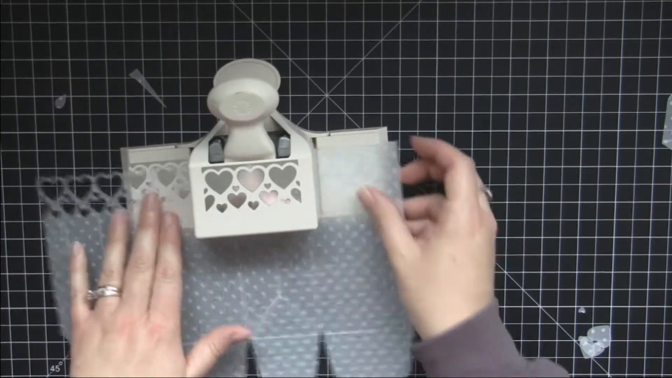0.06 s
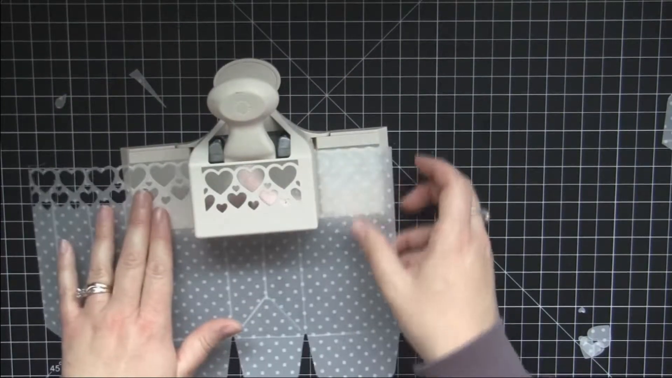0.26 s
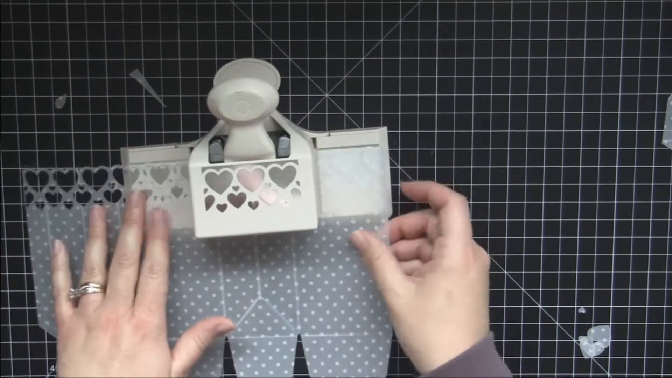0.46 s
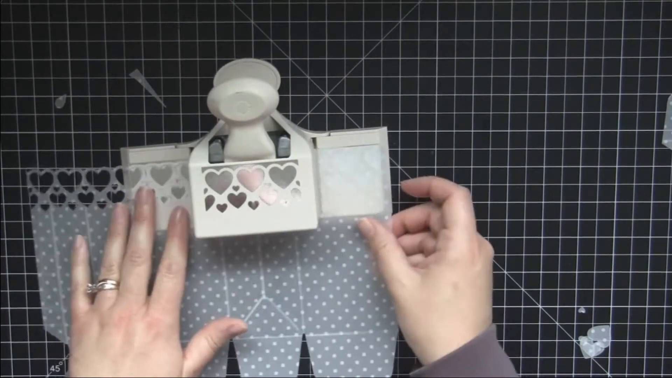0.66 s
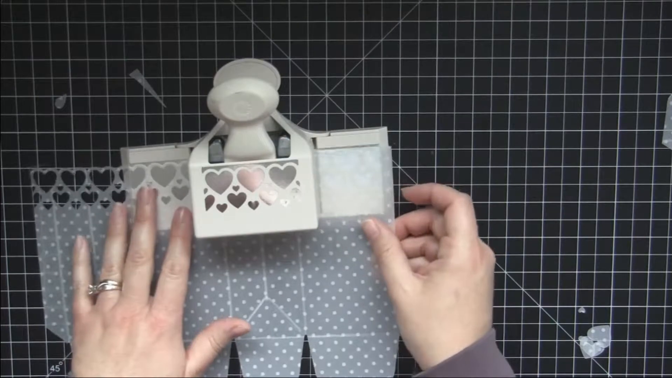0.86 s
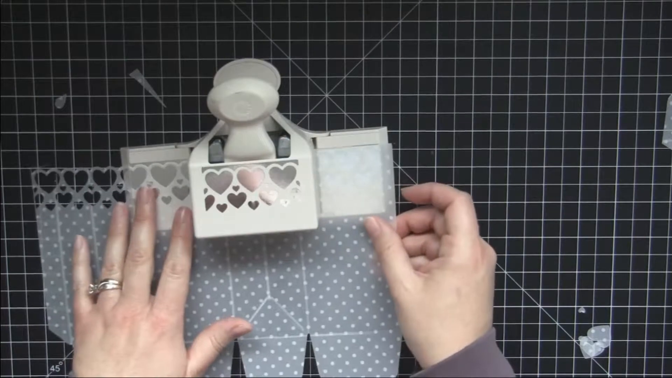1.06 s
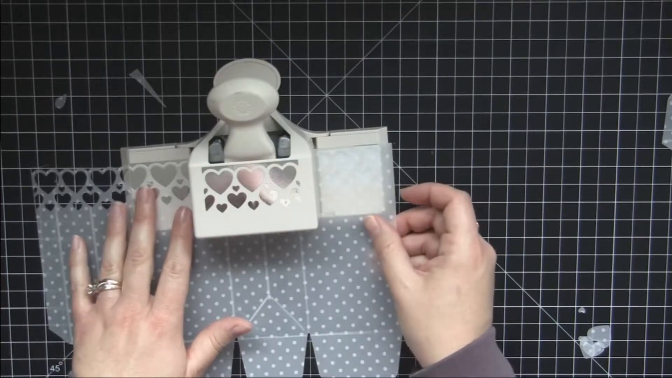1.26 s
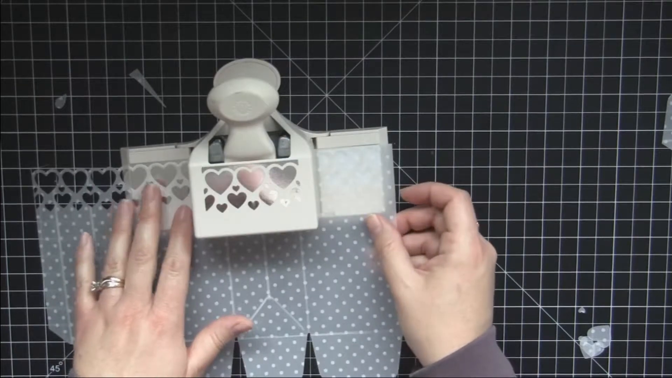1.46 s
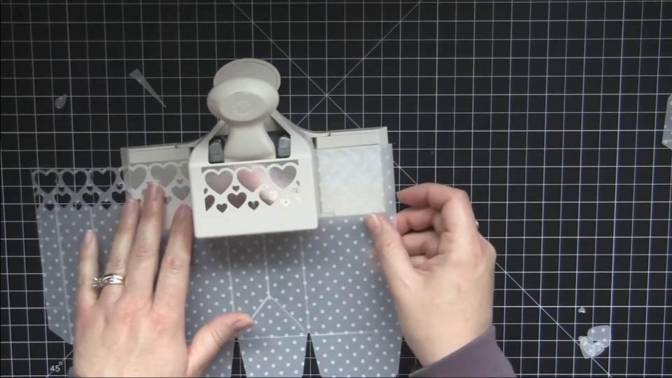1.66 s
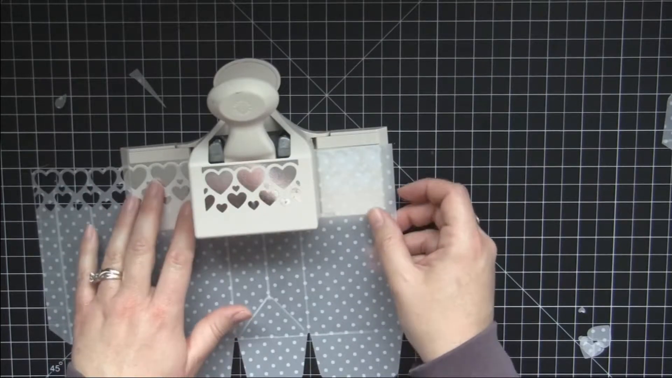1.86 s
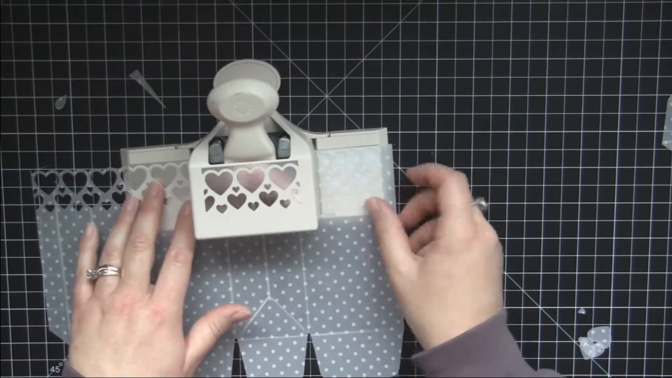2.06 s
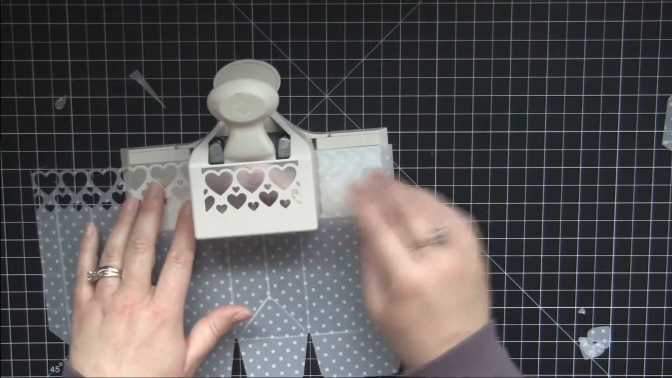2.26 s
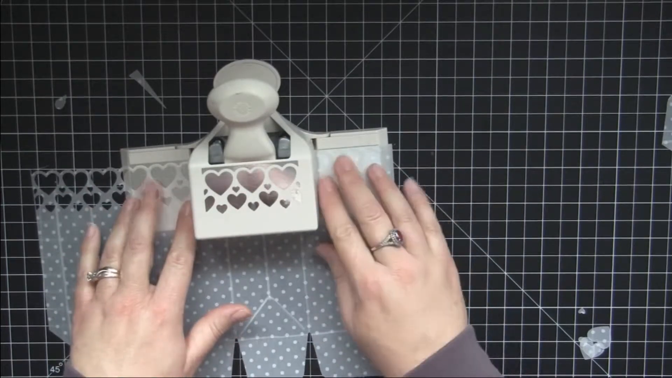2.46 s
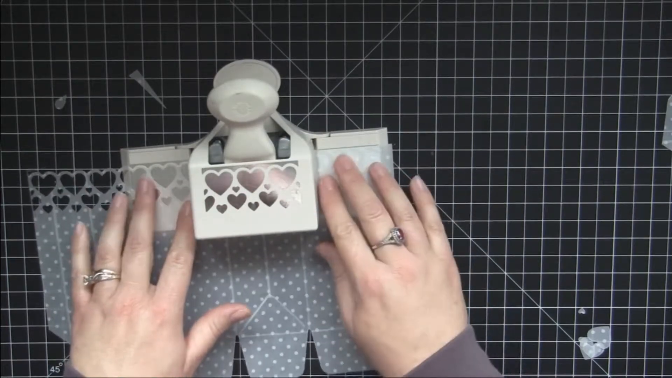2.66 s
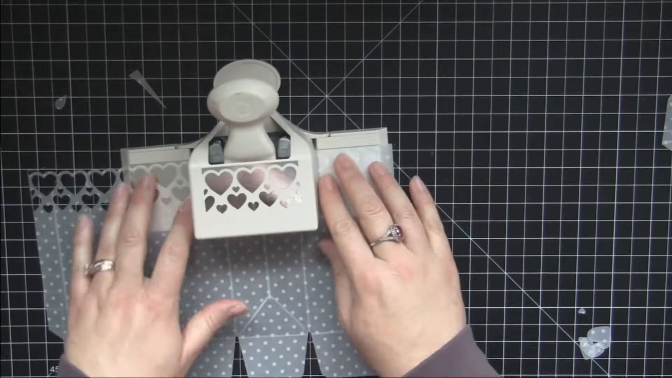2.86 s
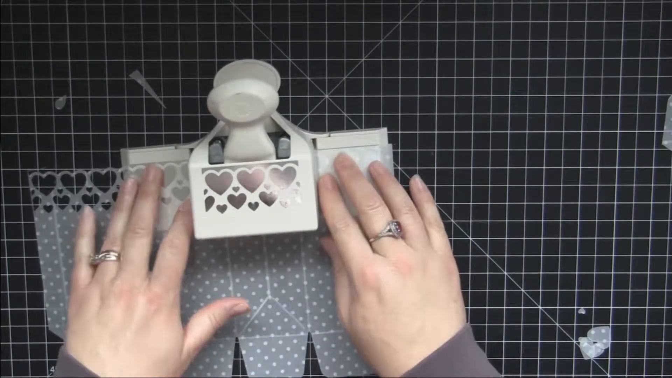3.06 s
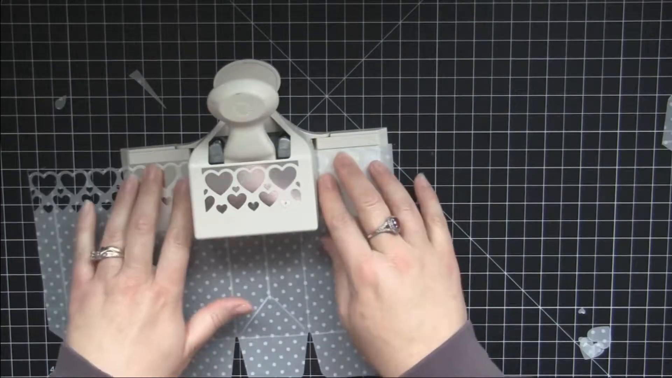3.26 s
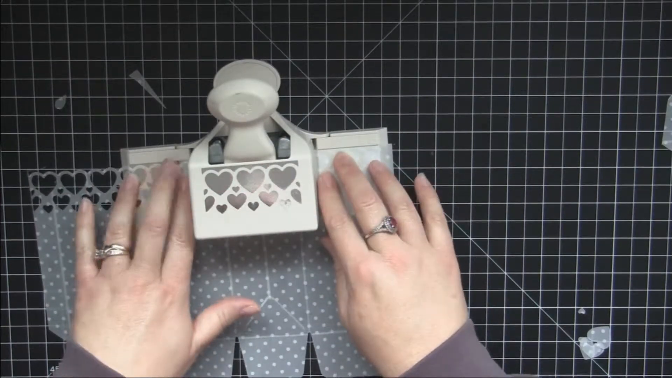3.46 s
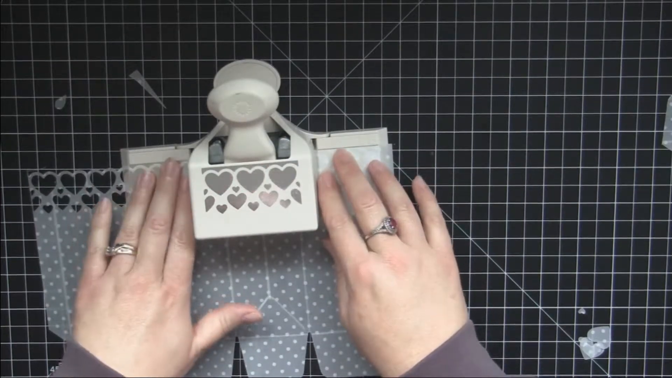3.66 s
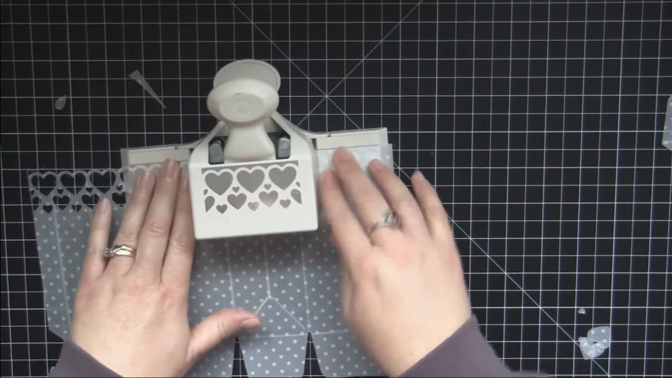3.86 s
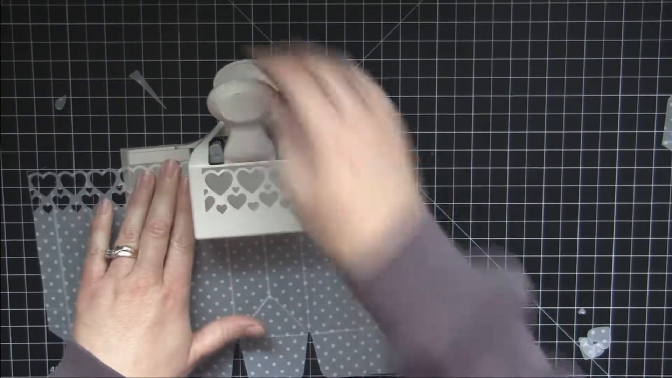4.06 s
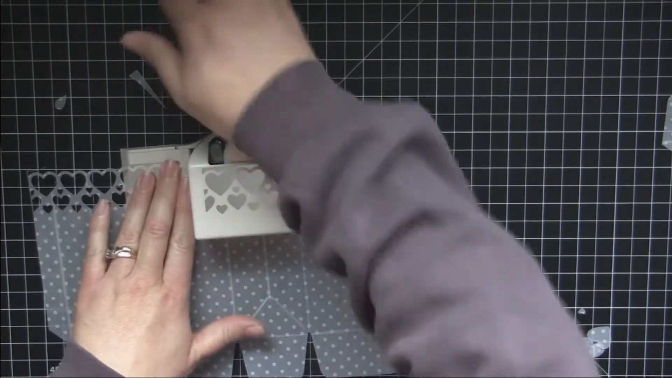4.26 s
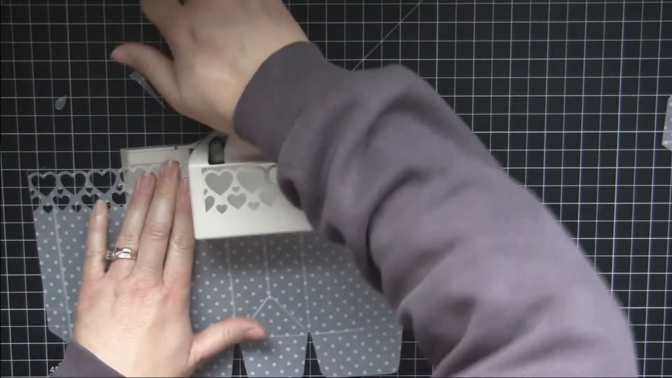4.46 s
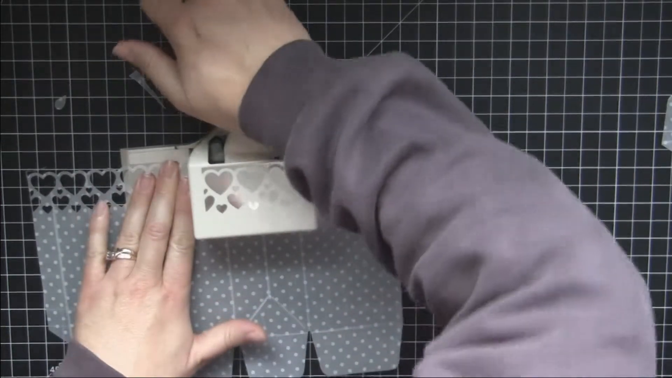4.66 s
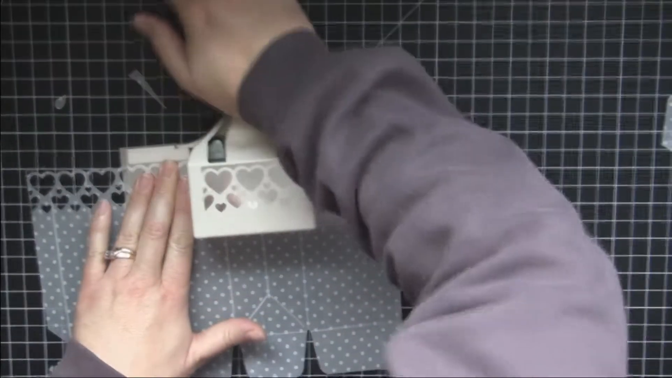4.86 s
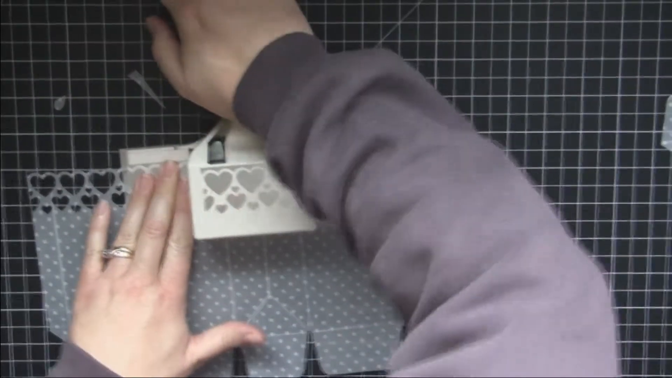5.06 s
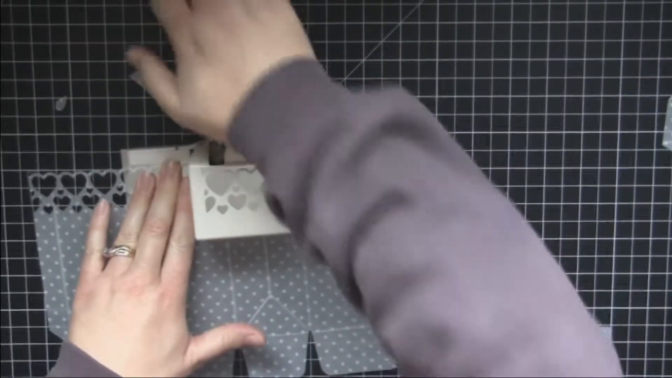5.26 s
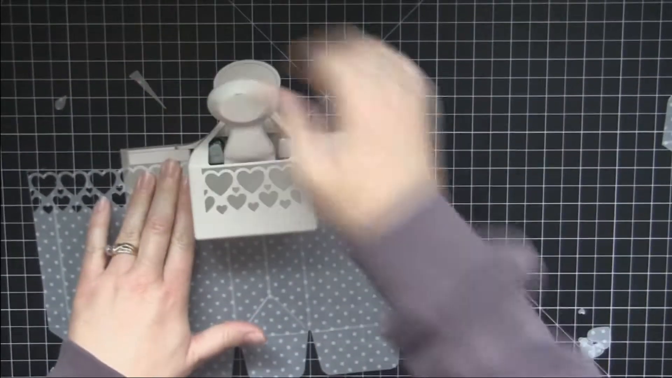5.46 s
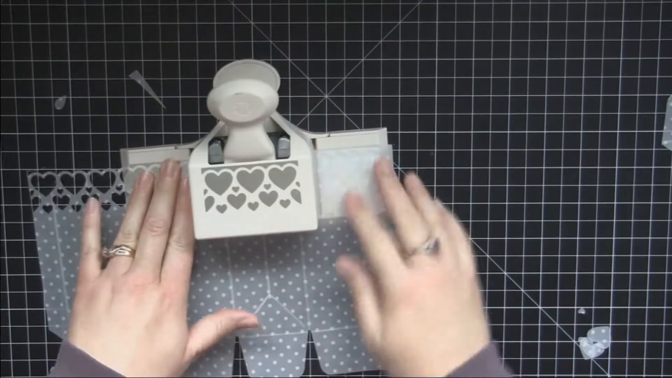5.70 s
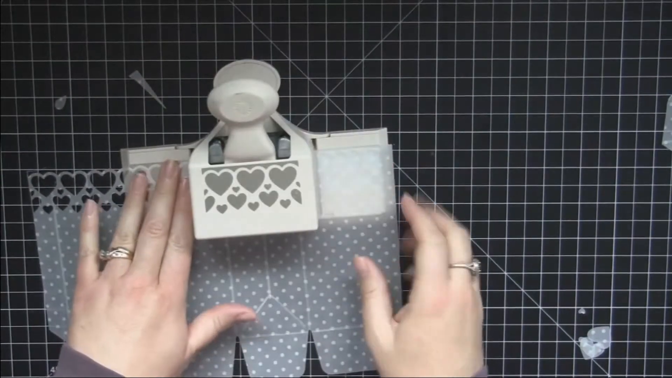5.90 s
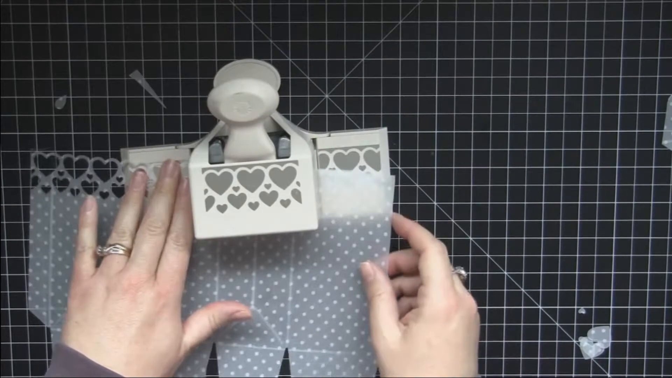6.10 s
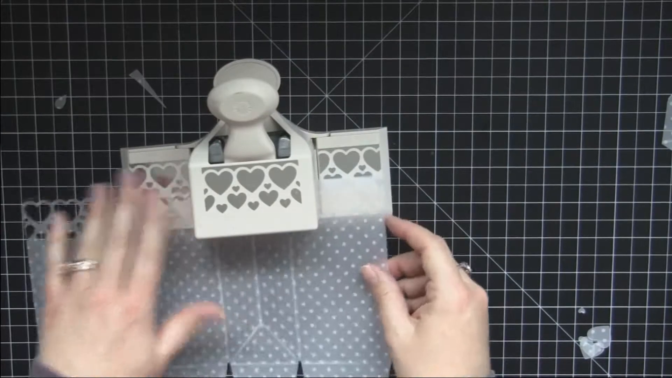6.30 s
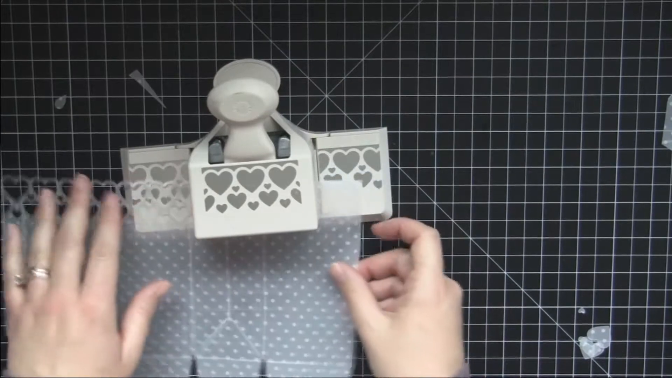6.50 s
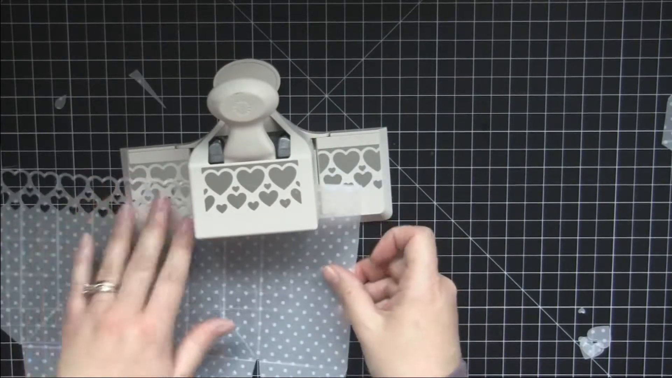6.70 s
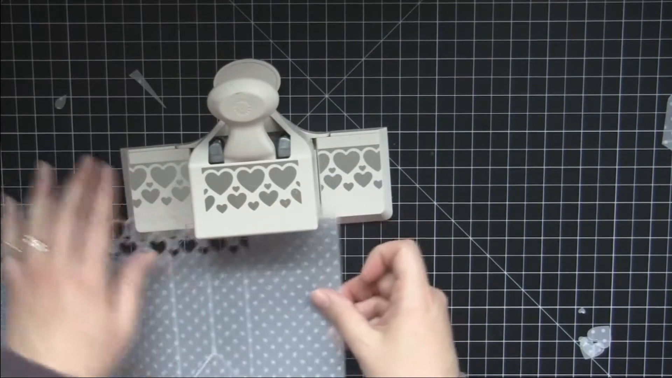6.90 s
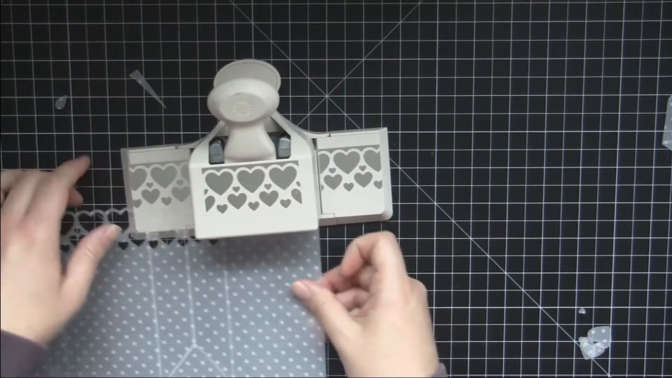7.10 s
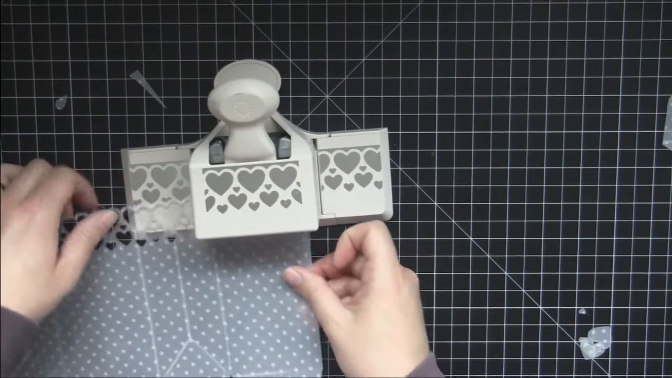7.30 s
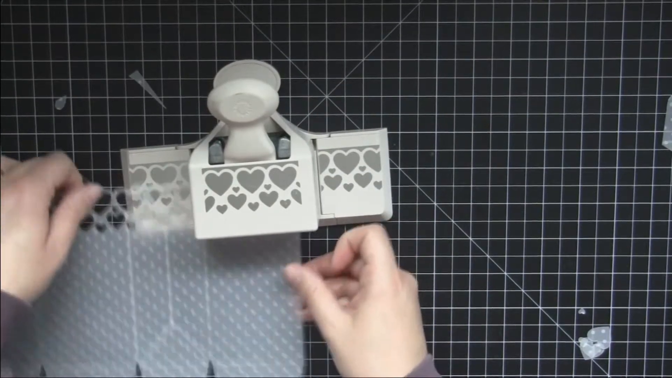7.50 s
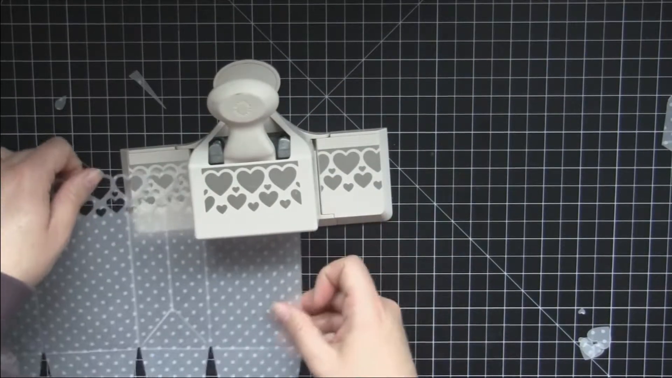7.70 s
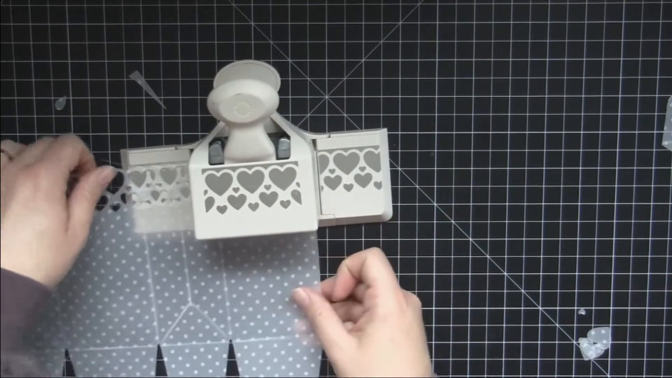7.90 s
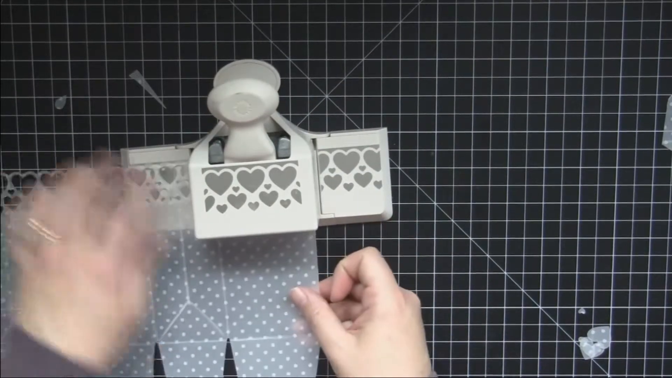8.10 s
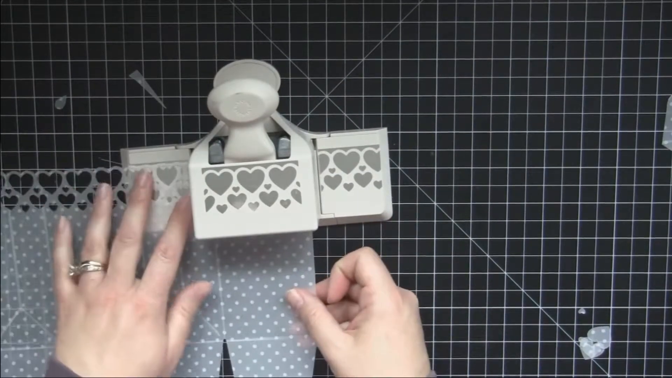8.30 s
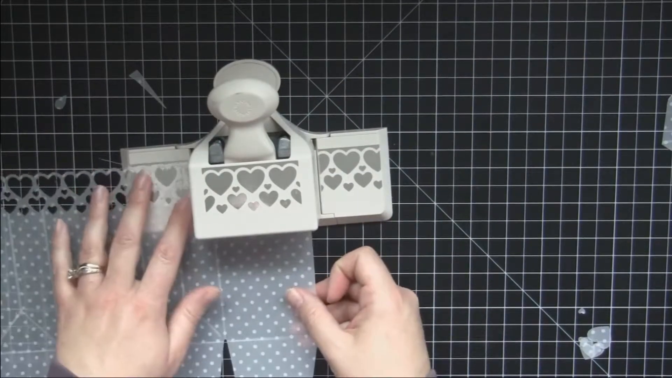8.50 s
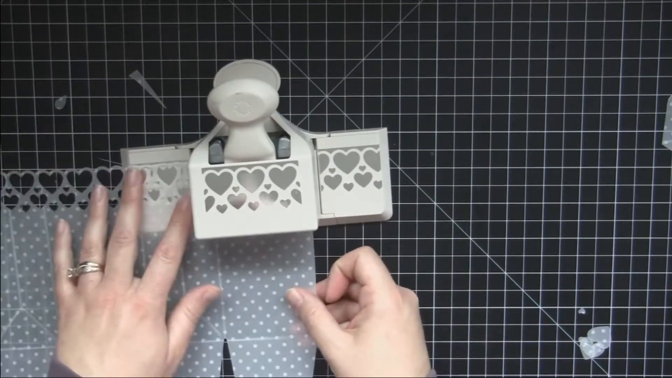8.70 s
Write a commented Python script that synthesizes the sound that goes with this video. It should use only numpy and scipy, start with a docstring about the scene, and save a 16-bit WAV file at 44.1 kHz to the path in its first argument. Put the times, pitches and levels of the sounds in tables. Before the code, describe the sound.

Thin stiff paper rustles, a craft punch crunches through it and clacks back up, then the sheet slides on.

```python
"""A small quiet room, close on a hand craft punch on a cutting mat.
Thin, stiff vellum rubs, hisses and snaps as it is slid and nudged along the hollow base.
The lever is pressed and the blades crunch through the sheet, ringing the loaded frame.
The lever scrapes back up, its return spring ticks, and the plastic housing clacks as it settles.
The sheet slides on, with one hard pull, over a steady hush."""
import sys
import numpy as np
from scipy import signal
from scipy.fft import rfft, irfft, next_fast_len
from scipy.io import wavfile
from scipy.ndimage import uniform_filter1d

SR = 44100
rng = np.random.default_rng(int(sys.argv[2]) if len(sys.argv) > 2 else 0)


def file_out(sig):
    """Save sig as 16-bit WAV at sys.argv[1]."""
    # one column per channel
    cols = np.atleast_2d(sig).T
    # limit, then scale
    lim = np.clip(cols, -1, 1)
    pcm = np.round(lim * 32767).astype(np.int16)
    wavfile.write(sys.argv[1], SR, pcm)


N = 385814

# lever strokes: three cuts, the return, the slack taken up
# (start [s], peak [s], end [s], level [dB], scrape offset [dB], swell from start to peak [dB])
LEVER_STROKES = [(4.637, 4.665, 4.77, -26.5, -28, -2), (4.822, 4.865, 4.93, -12.5, -21.5, 5),
                 (4.93, 4.957, 5.07, -15.5, -19.5, 6.5), (5.207, 5.375, 5.45, -32, -10, 7),
                 (4.802, 4.824, 4.85, -31, -26, 2)]
# bright edge of scrapes and cracks: (frequency [Hz], level [dB])
EDGE_SPECTRUM = [(2500, -18.5), (4200, -11.5), (5500, -17.5), (11000, -19), (15700, -37)]
FADE_DB = 31  # a stroke ends this far under its peak


def blades():
    """The lever grinds and scrapes while the blades bite through the sheet and ring the frame."""
    # blades breaking through: (time [s], level [dB], sharpness [dB])
    breaks = [(4.608, -22, -7), (4.638, -12.5, 11.5), (4.727, -23.5, -14.5), (4.803, -22, -7),
              (4.825, -11, -7), (4.837, -9, 8), (4.937, -7, 6), (4.953, -1, 9), (4.966, -1.5, 11)]
    # modes of the punch under load: (frequency [Hz], base width [Hz], level [dB])
    frame = [(204, 20, -4), (337, 15, 0), (483, 33, 2), (706, 99, 2.5), (894, 98, 0), (1257, 93, 4),
             (1506, 207, -1), (1854, 69, -3.5), (2350, 59, -7.5), (3010, 185, -8), (3610, 127, -9),
             (4336, 170, -13.5)]
    force = friction(slips_per_s=1400, spread_db=6, smooth=.4)
    pushes = [stroke(*row[:4], row[5]) for row in LEVER_STROKES]
    pressure = sum(pushes)
    low, high = (unit(resonant(force, modes, widen=2.5)) for modes in (frame[:5], frame[5:]))
    # light pressure sounds duller than the full cut
    grind = amp(-7.5) * pressure * (low + amp(9) * pressure ** 0.44 * high)
    scrape_gain = sum(push * amp(row[4]) for push, row in zip(pushes, LEVER_STROKES))
    bites = strike(breaks + crunch(), frame, widen=2.3, attack_s=0.00054, chatter_s=0.00406,
                   tilt_db=4.5, sharp_tilt=0.5, crack_t60=0.023, crack_db=-6.5, drift=0.027)
    return grind + scrape_gain * coloured(force, EDGE_SPECTRUM) + amp(-3.5) * bites


def crunch(mean_gap_s=.009):
    """Small random bites crowd each cut: (time [s], level [dB], sharpness [dB])."""
    bites = []
    for start, peak, end, db, _, swell_db in LEVER_STROKES[:3]:
        gap, softness = rng.random((2, 8))
        times = start + np.cumsum(mean_gap_s * (.5 + gap))
        contour = np.interp(times, [start, peak, end], [-swell_db, 0, -FADE_DB], right=-200)
        bites += zip(times, db + contour - 6 * softness, -3 - 5 * softness)
    return bites


def housing():
    """Knocks ring the plastic shell in short clacks."""
    # knocks: (time [s], level [dB], sharpness [dB], pitch the struck spot favours [Hz])
    clacks = [(0.003, -29, 7, 895), (0.156, -30.5, 5, 1100), (0.189, -24, 17, 1160), (4.012, -48, 0, 1250),
              (4.441, -27.5, -9, 770), (5.051, -23, 13, 1320), (5.075, -24.5, 0, 1190),
              (5.169, -29, -13, 1400), (5.23, -26, 0, 1186), (5.25, -25.5, 7, 1310),
              (5.364, -21.5, -3, 1050), (5.392, -18, 2, 1230), (5.442, -20, 3.5, 1630),
              (5.546, -20, 3.5, 1490), (5.587, -30, 1, 1200), (5.601, -30.5, -13, 990),
              (5.75, -19, 4.5, 1370), (5.89, -28, -5.5, 1180), (7.684, -32, -1, 470)]
    # housing modes: (frequency [Hz], base width [Hz], level [dB])
    shell = [(336, 34, -4), (499, 24.4, -6.5), (764, 42, -6.5), (925, 50.5, 1.5), (1218, 39, 4.5),
             (1410, 153, 5), (1656, 71, 1.5), (2407, 82, -6.5), (2620, 95, -5), (3460, 105, 1.5)]
    return amp(2.0) * strike(clacks, shell, widen=3.22, attack_s=0.00078, chatter_s=0.004016,
                             tilt_db=0.7, sharp_tilt=0.39, crack_t60=0.01, crack_db=-8, drift=0.018)


def spring():
    """The return spring and its metal guide tick as the lever rises."""
    # metal contacts: (time [s], level [dB], sharpness [dB])
    pings = [(5.186, -43, 10), (5.214, -17.5, 7), (5.223, -21, 7.5), (5.238, -19, 10), (5.3, -17.5, -8),
             (5.336, -23, 4), (5.367, -22, -2)]
    # spring modes: (frequency [Hz], base width [Hz], level [dB])
    modes = [(1770, 174, -5.5), (2540, 140, -4.5), (4200, 300, -2), (6440, 240, -11.5), (10300, 460, -1.5)]
    return strike(pings, modes, widen=2.0, attack_s=0.00042, chatter_s=0.0044,
                  tilt_db=0.5, sharp_tilt=0.76, crack_t60=0.012, crack_db=6, drift=0.017)


def vellum():
    """The stiff sheet rubs, hisses and snaps; a hard pull sounds the hollow base."""
    # the sheet snaps and catches: (time [s], level [dB], sharpness [dB])
    catches = [(0.188, -18, 4.5), (0.327, -36, -6), (0.456, -32.5, -1), (0.693, -36.5, 2),
               (1.1995, -38.5, 14), (2.544, -44, 6), (2.593, -41, -10), (2.606, -35.5, -19),
               (2.649, -36, 5), (2.887, -48, -2), (3.567, -53, 12.5), (3.651, -42.5, 7),
               (6.279, -19.5, -13), (6.335, -27.5, 2), (6.443, -32, 3), (6.594, -22.5, -20),
               (6.689, -25.5, -13), (6.856, -44.5, 13), (6.884, -25, 1), (7.102, -32, 0), (7.11, -19.5, 2),
               (7.4885, -31, 4.5), (8.004, -22.5, -17), (8.032, -34.5, 0), (8.092, -35, -6),
               (8.331, -37.5, -4)]
    # pull across the base: (start [s], peak [s], end [s], level [dB], swell [dB])
    hard_pull = (7.632, 7.69, 7.88, -35.5, 2)
    # modes of the sheet and of the base: (frequency [Hz], base width [Hz], level [dB])
    sheet_modes = [(906, 120, -13.5), (1240, 104, -10.5), (1555, 140, -5), (2386, 180, 5), (2963, 186, 0),
                   (3610, 170, -8.5), (5640, 630, -24)]
    base_modes = [(385, 60, -3.5), (480, 68, 1), (1430, 43, -6.5), (2280, 67, -8), (3800, 240, -15.5),
                  (5520, 340, -11)]
    # body and top of the sliding sound: (frequency [Hz], level [dB])
    rub_spectrum = [(400, -18.5), (800, -12), (1100, -3), (1600, -7), (2400, -3), (3500, -7.5),
                    (6000, -27.5), (9000, -30), (15700, -34)]
    hiss_spectrum = [(2500, 0), (4000, 2.5), (5500, 5), (8000, 2), (12000, 2), (14000, -14), (15700, -40)]
    force = flex(friction(slips_per_s=1800, spread_db=6, smooth=1.1), depth_db=2.2)
    rub, hiss = slides(rise=0.14)
    sliding = rub * coloured(force, rub_spectrum) + hiss * coloured(force, hiss_spectrum)
    drag = friction(slips_per_s=400, spread_db=5, smooth=.6)
    pull = stroke(*hard_pull) * unit(resonant(drag, base_modes, widen=1.5))
    snaps = strike(catches, sheet_modes, widen=2.89, attack_s=0.00036, chatter_s=0.005,
                   tilt_db=0.0, sharp_tilt=0.11, crack_t60=0.013, crack_db=8.5, drift=0.045)
    return sliding + pull + amp(-1.5) * snaps


def slides(rise):
    """Rub and hiss envelopes follow the sheet's speed: each slide swells and eases out."""
    # short slides: (start [s], length [s], rub level [dB], hiss offset [dB])
    moves = [(0, 0.036, -49.5, 0.5), (0.039, 0.25, -45, -8.5), (0.312, 0.033, -54.5, -17),
             (0.429, 0.076, -54, -10.5), (0.491, 0.14, -57.5, -3.5), (0.699, 0.076, -58, -11),
             (0.803, 0.058, -61, -10.5), (0.932, 0.05, -59, -22), (1.029, 0.04, -55.5, -14),
             (2.062, 0.25, -70.5, 4), (2.489, 0.16, -70, 2.5), (3.22, 0.054, -79, 6),
             (5.851, 0.025, -60, 2.5), (5.917, 0.065, -56.5, -3.5), (5.972, 0.34, -64.5, -7),
             (6.054, 0.066, -49, -12), (6.126, 0.049, -58.5, -9), (6.298, 0.15, -52.5, -4),
             (6.478, 0.21, -54, 0), (6.858, 0.074, -54, 0), (6.915, 0.19, -60, -4), (7.11, 0.16, -62, -4.5),
             (7.245, 0.26, -62.5, -6), (7.38, 0.31, -60, -11.5), (7.62, 0.18, -55, 8),
             (7.756, 0.2, -57.5, -22), (7.907, 0.11, -55.5, -15), (8.066, 0.067, -57, -9)]
    rub, hiss = np.zeros((2, N + SR))
    for start, length, rub_db, hiss_db in moves:
        progress = np.arange(round(3 * length * SR)) / (length * SR)
        speed = (1 - np.exp(-(progress / rise) ** 2)) / (1 + (progress / .8) ** 6)
        rub[round(start * SR):][:len(speed)] += amp(rub_db) * speed
        hiss[round(start * SR):][:len(speed)] += amp(rub_db + hiss_db) * speed
    return rub[:N], hiss[:N]


def flex(x, depth_db):
    """The bending sheet favours other pitches from moment to moment."""
    spectra = signal.stft(x, nperseg=256)[2]
    patches = uniform_filter1d(rng.standard_normal(spectra.shape), size=7, axis=0)
    patches = unit(uniform_filter1d(patches, size=9, axis=1))
    return unit(signal.istft(spectra * amp(depth_db * patches), nperseg=256)[1][:N])


def strike(events, modes, widen, attack_s, chatter_s, tilt_db, sharp_tilt, crack_t60, crack_db, drift):
    """Each contact rings the modes afresh and adds a bright crack; sharp ones favour the high modes."""
    rattle, spot_db_per_octave = 1.28, 6
    rings, cracks = np.zeros((2, N + SR))
    t = np.arange(SR // 16) / SR
    hz, width, level = np.transpose(modes)[:, :, None]
    damping = np.maximum(widen * width, hz / 10)  # high modes die fastest
    onset = (1 - np.exp(-t / attack_s)) ** 2
    for time, db, sharp_db, *spot in events:
        tilt = (tilt_db + sharp_tilt * sharp_db) * np.log2(hz / 1500)
        strength = amp(level + tilt + rng.normal(0, 1.2, hz.shape))
        strength *= amp(-spot_db_per_octave * sum(np.abs(np.log2(hz / centre)) for centre in spot))
        pitch = hz * (1 + drift * rng.standard_normal(hz.shape))  # grip and load shift the modes
        # loose parts rattle: each mode's phase wanders while it rings
        wander = np.sqrt(2 * np.pi * rattle * damping / SR) * rng.standard_normal((len(hz), len(t)))
        wander = uniform_filter1d(np.cumsum(wander, axis=1), size=48, axis=1)
        phase = 2 * np.pi * pitch * t + rng.uniform(0, 2 * np.pi, hz.shape) + wander
        ring = onset * np.sum(strength * np.exp(-np.pi * damping * t) * np.sin(phase), axis=0)
        # small rebounds follow within milliseconds
        for delay, size in rng.random((3, 2)):
            ring = ring + 0.41 * size * np.pad(ring, (round(delay * chatter_s * SR), 0))[:len(t)]
        crack_gain = amp(db + sharp_db + crack_db - 60 * t / crack_t60) * onset
        rings[round(time * SR):][:len(t)] += amp(db) * ring / np.abs(ring).max()
        cracks[round(time * SR):][:len(t)] += crack_gain * rng.standard_normal(len(t))
    return rings[:N] + filtered(cracks[:N], lambda f: amp(along(EDGE_SPECTRUM, f)))


def friction(slips_per_s, spread_db, smooth):
    """Gritty force: random slips of scattered size over a smooth rubbing noise."""
    slips = (rng.random(N) < slips_per_s / SR) * rng.standard_normal(N)
    slips *= amp(spread_db * rng.uniform(-0.76, 1, N))
    return unit(unit(slips) + smooth * rng.standard_normal(N))


def stroke(start, peak, end, db, swell_db):
    """Envelope of one push: it ramps to its level, then fades."""
    levels = [db - swell_db, db, db - FADE_DB]
    return amp(np.interp(np.arange(N) / SR, [start, peak, end], levels, left=-200, right=-200))


def resonant(x, modes, widen):
    """x through a set of resonances, damped by the hand that holds the object."""
    def band(f, hz, width):
        return 1j * f * width / (hz * hz - f * f + 1j * f * width)
    return filtered(x, lambda f: sum((-1) ** k * amp(db) * band(f, hz, width * widen)
                                     for k, (hz, width, db) in enumerate(modes)))


def coloured(x, spectrum):
    """x shaped by a spectrum, rms 1."""
    return unit(filtered(x, lambda hz: amp(along(spectrum, hz))))


def filtered(x, response):
    """x through a complex frequency response."""
    size = next_fast_len(N + SR // 2)
    return irfft(rfft(x, size) * response(np.fft.rfftfreq(size, 1 / SR)), size)[..., :N]


def along(points, hz):
    """Curve through (frequency [Hz], value) points on a log axis."""
    knots, values = np.transpose(points)
    return np.interp(np.log(hz + 1), np.log(knots + 1), values)


def amp(db):
    """dB to gain."""
    return 10 ** (np.asarray(db) / 20)


def unit(x):
    """Scaled to rms 1."""
    return x / np.sqrt(np.mean(x ** 2) + 1e-20)


def room(x):
    """Forward and sideways reflections off table and walls; they change as the hands move."""
    # room decay: (frequency [Hz], t60 [s])
    decay = [(200, 0.23), (800, 0.32), (1500, 0.24), (3500, 0.22), (12000, 0.098)]
    out, hop = np.zeros((2, N + SR)), SR // 8
    for start in range(0, N, hop):
        hz, t, noise = signal.stft(rng.standard_normal((2, SR // 3)), SR, nperseg=256)
        tail = signal.istft(noise * amp(-60 * t / along(decay, hz)[:, None]), SR, nperseg=256)[1]
        age = np.arange(tail.shape[1]) / SR
        tail[0] *= 1 + 0.56 * np.exp(-age / 0.019)  # ahead, the table top answers first and strongest
        tail[1] *= 1 + 6 * np.exp(-age / 0.0012)  # sideways, early scatter off hands and table
        tail /= np.linalg.norm(tail, axis=1)[:, None]
        wet = signal.fftconvolve(x[None, start:start + hop], tail, axes=1)
        out[:, start:start + wet.shape[1]] += wet
    return out[:, :N]


def room_tone():
    """Steady hush of the room and the microphone."""
    # colour of the hush: (frequency [Hz], level [dB])
    spectrum = [(20, -30), (60, -20.5), (110, -11.5), (240, -4.5), (500, -2), (800, -6), (2000, -14.5),
                (6000, -29), (13500, -35.5), (15700, -41)]
    # its stereo image: (frequency [Hz], left-right correlation [-1..1])
    likeness = [(60, 0.77), (200, -0.33), (600, -0.54), (1700, -0.16), (5000, 0.25)]
    def shape(hz):
        angle = np.arccos(np.clip(along(likeness, hz), -1, 1)) / 2
        return amp(along(spectrum, hz)) * [np.cos(angle), np.sin(angle)]
    mid, side = filtered(rng.standard_normal((2, N)), shape)
    return amp(-54.5) * unit(np.array([mid + side, mid - side])) * amp([[-.3], [.3]])


def scene():
    """Punch and sheet up close in mid-side stereo, with the room around them."""
    # stereo width: (frequency [Hz], side level [dB])
    width = [(200, -21.5), (700, -10.5), (2000, -17), (4500, -9.5), (9000, -3), (15000, 2)]
    # stereo balance: (frequency [Hz], left minus right [dB])
    balance = [(300, -.5), (8000, -1), (13000, 0)]
    near = blades() + housing() + spring() + vellum()
    # the bass falls away steeply below about 130 Hz
    near = signal.sosfilt(signal.butter(6, 130, "high", fs=SR, output="sos"), near)
    ahead, sideways = room(near)
    mid = near + amp(-4.5) * ahead
    side = filtered(sideways, lambda hz: amp(along(width, hz)))
    pair = np.array([mid + side, mid - side])
    return filtered(pair, lambda hz: amp(np.outer([.5, -.5], along(balance, hz)))) + room_tone()


def record(dry):
    """A brick-wall low-pass takes off the very top."""
    return filtered(dry, lambda hz: hz < 15750)


dry = scene()
out = record(dry)
file_out(out)
```